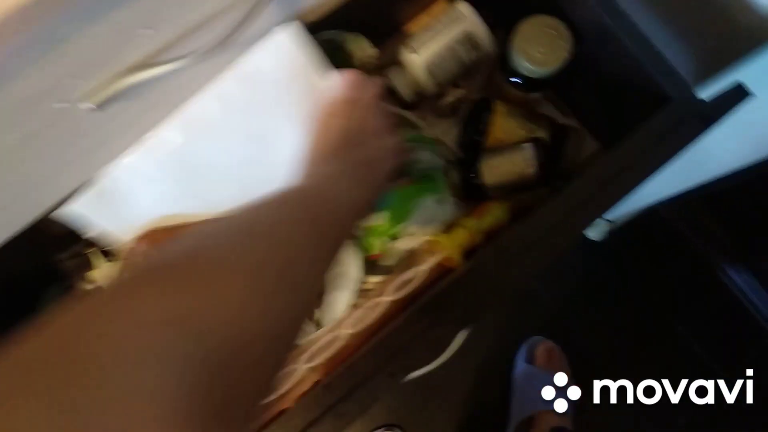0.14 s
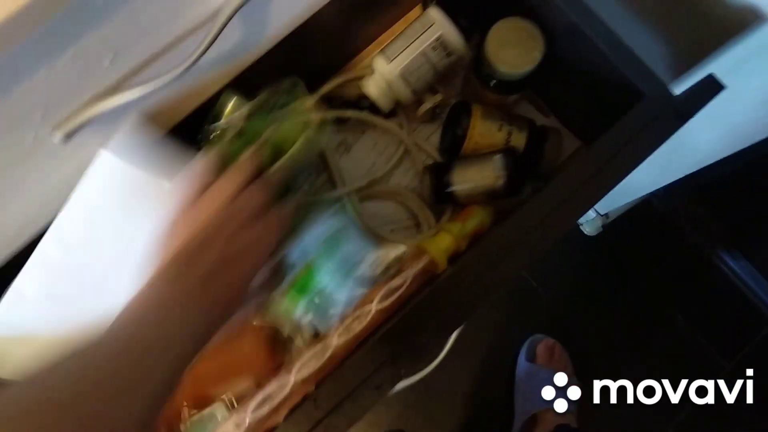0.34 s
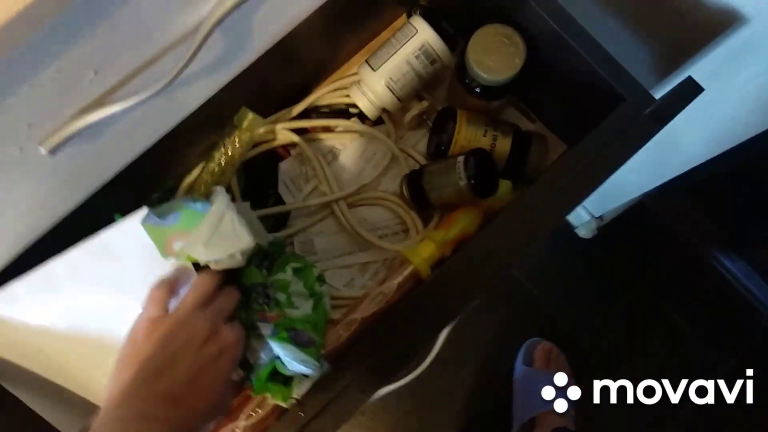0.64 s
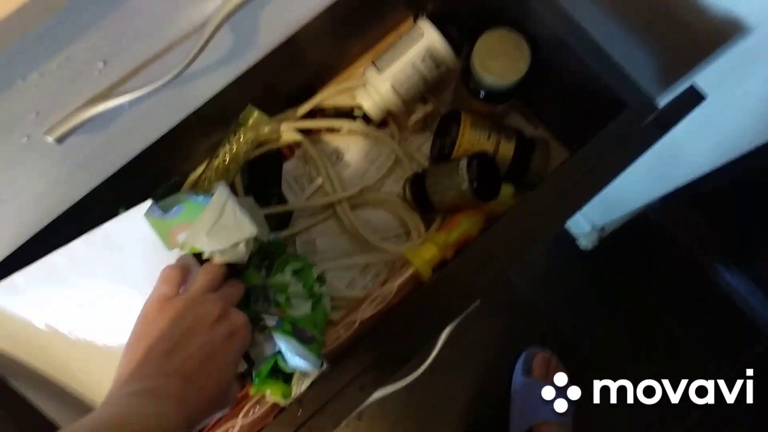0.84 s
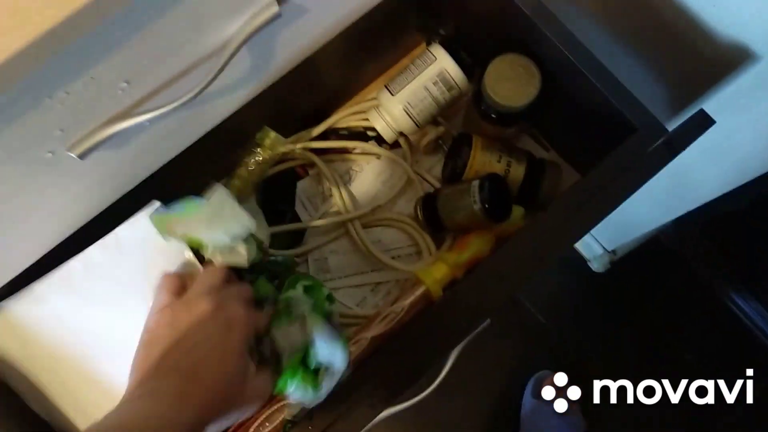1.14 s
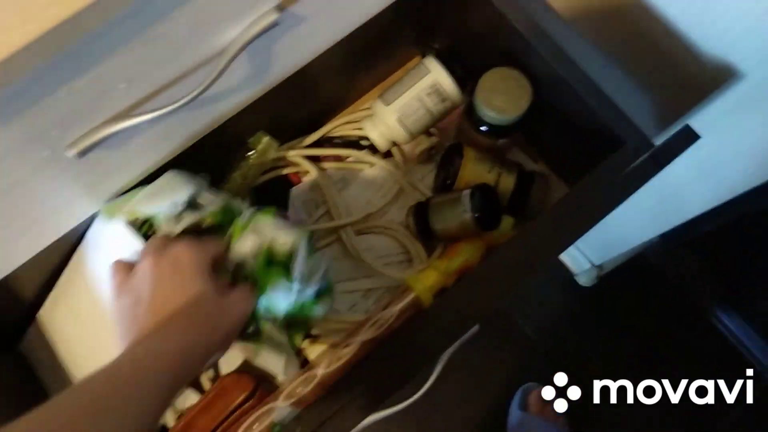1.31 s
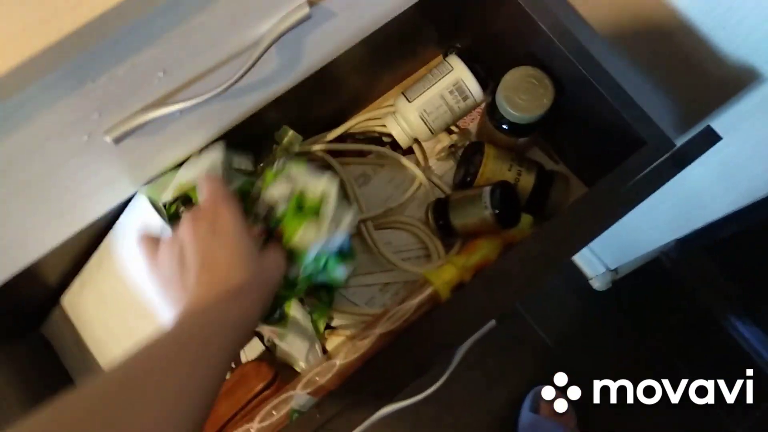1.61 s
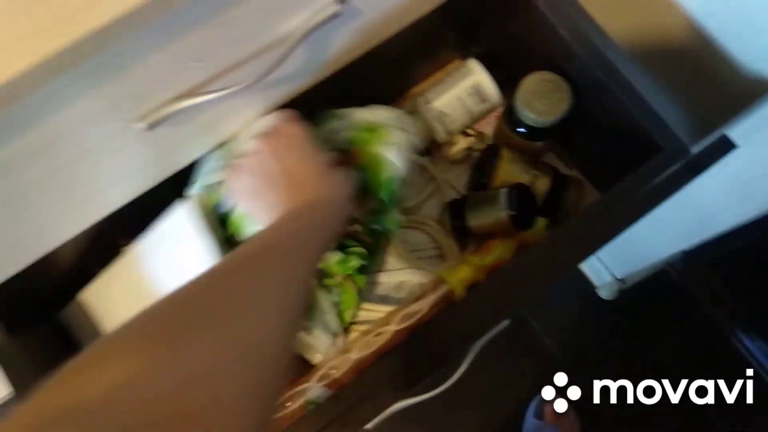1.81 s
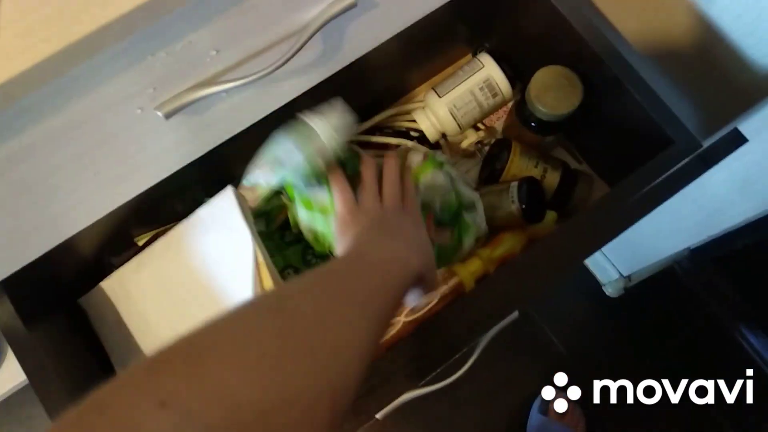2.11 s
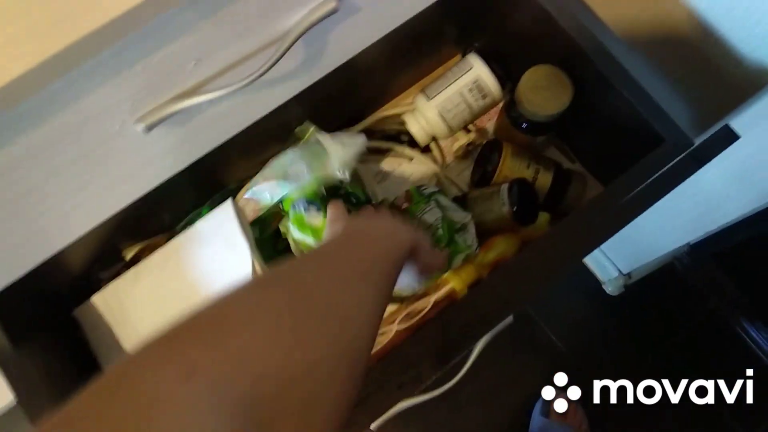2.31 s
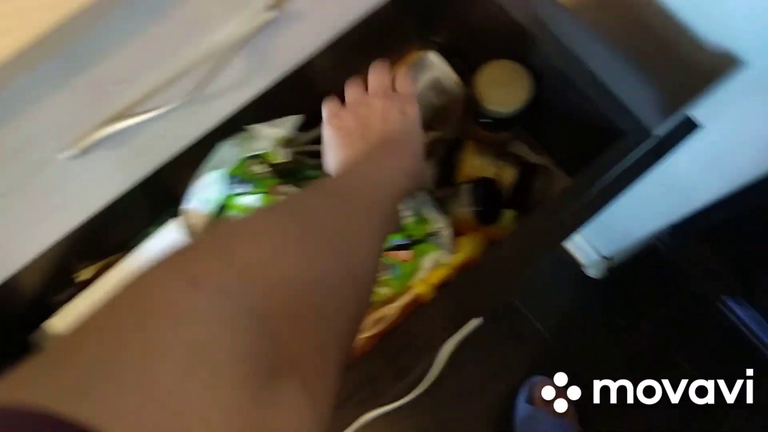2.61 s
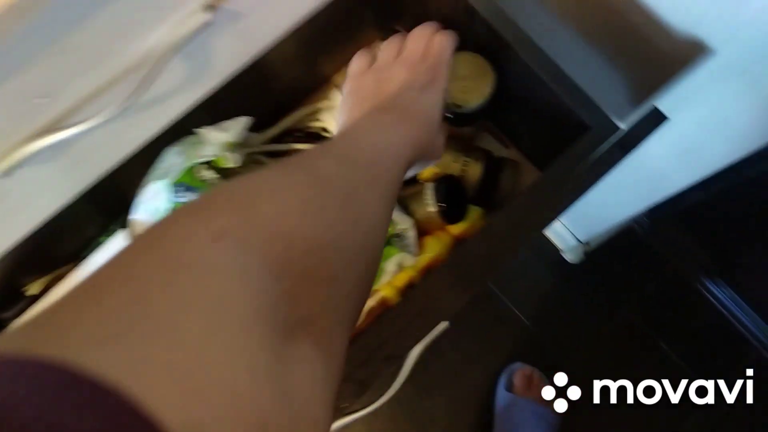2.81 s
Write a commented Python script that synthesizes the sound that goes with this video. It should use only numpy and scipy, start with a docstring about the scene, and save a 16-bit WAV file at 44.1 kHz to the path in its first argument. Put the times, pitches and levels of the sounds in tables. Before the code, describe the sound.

Crinkling plastic bags with sharp snaps and dull drawer bumps, ending in faint jar clicks

```python
"""Thin plastic bags are crumpled by a hand in a cluttered wooden drawer, close by, in a small room.
Their rustle is a swarm of tiny damped pings over sliding noise; noise-burst snaps stand out of it.
Low noise scuffs the drawer, its panel modes ring to dull bumps, and hollow containers knock as single tones.
At the end jars and bottles rub faintly and click (struck modes and ticks) and three tones ring on.
Short echoes, a room tail and quiet coloured noise surround it; a small microphone sheds the deep bass."""
import sys
import numpy as np
from scipy import signal
from scipy.fft import rfft, irfft, next_fast_len
from scipy.io import wavfile
from scipy.ndimage import uniform_filter1d, map_coordinates

SR = 44100
rng = np.random.default_rng(int(sys.argv[2]) if len(sys.argv) > 2 else 0)


def waveform_to_disk(signal):
    """Save audio, clipped to [-1, 1], as 16-bit WAV at the path in sys.argv[1]."""
    frames = np.transpose(np.atleast_2d(signal))
    scaled = np.clip(frames, -1, 1) * 32767
    samples = np.round(scaled).astype(np.int16)
    wavfile.write(sys.argv[1], SR, samples)


N = 130095
TOP_HZ = 15850  # upper band limit of the microphone and the snaps
GRAB_START_S, GRAB_END_S = 1.34, 1.68  # the hand closes round the bag

# colour of the scuffing: pitch_hz, level_db (relative, per Hz)
SCUFF_COLOUR = [(35, -59.5), (60, -39), (166, -26), (215, -9), (291, -12), (405, 1.5), (498, -1), (620, -9),
                (752, -11), (862, -27.5), (1090, -21), (1200, -16), (1600, -15), (2080, -20), (3520, -120)]
SCUFF_DB = 0.5  # added to the scuffing of every row of STROKES
CREASE_DB, CREASES_PER_S, CREASE_CYCLES, CREASE_SPREAD_DB = -2, 3600, 1.67, 3.5
SLIDE_DB = -3.5
# wider facets of the film flip over more rarely and ring longer; they stand out in gentle strokes
FACETS_PER_S, FACET_FLIPS_PER_S, FACET_CYCLES, FACET_SPREAD_DB = 800, 190, 9.1, 4
FACET_DB, FACET_GROWS_DB = -8.5, 0.55  # level, and its growth per dB below the hardest stroke
# a gentler stroke crackles more unevenly, per dB below the hardest
CLUMPS_PER_S, CLUMP_DB, CLUMP_GROWS_DB = 170, 1, 0.2774
SLIDE_FROM_S, SLIDE_UNEVEN = (2.3, 2.483), 0.63  # at last the bag mostly slides, with less crackle
TREBLE_HZ = 4740


LIFTED_HZ = 287  # the lifted bag no longer drives the drawer's panels below this


def bags_and_rub():
    """Strokes crumple, slide and scuff the bags; a last faint rub of the jars is made of the same noises."""
    t = np.arange(N) / SR
    level_db, tilt_db, scuff_db = effort()
    gentle_db = np.minimum(level_db.max() - level_db, 13) * np.interp(t, SLIDE_FROM_S, [1, SLIDE_UNEVEN])

    depth_db = CLUMP_DB + CLUMP_GROWS_DB * gentle_db
    # deeper clumping is turned down to offset its louder peaks
    clumps_db = depth_db * np.clip(wobble(CLUMPS_PER_S), -2, 2) - depth_db ** 2 / 10

    creases = pings(CREASES_PER_S, CREASE_CYCLES, CREASE_SPREAD_DB, CREASES_PER_S, size=128)
    fine = amp(CREASE_DB) * creases + amp(SLIDE_DB) * noise(BAG_COLOUR)
    facets = pings(FACETS_PER_S, FACET_CYCLES, FACET_SPREAD_DB, FACET_FLIPS_PER_S)
    share = amp(FACET_DB + FACET_GROWS_DB * gentle_db)
    film = (fine + share * facets) / np.sqrt(1 + share ** 2) * amp(clumps_db)

    treble = filtered(film, lambda hz: hz ** 4 / (hz ** 4 + TREBLE_HZ ** 4))
    tilted = treble * amp(tilt_db) + (film - treble) * amp(-.7 * tilt_db)
    crinkle = amp(level_db) * tilted

    scuff = amp(scuff_db + SCUFF_DB) * unit(noise(SCUFF_COLOUR) * amp(0.68 * clumps_db))
    lifted = np.interp(t, [GRAB_START_S, GRAB_END_S], [0, 1])
    scuff = scuff - lifted * filtered(scuff, lambda hz: 1 / (1 + (hz / LIFTED_HZ) ** 6))
    return folds(folds(pockets(crinkle + scuff)))


# strokes of the hand on the bags; the last row is a short faint rub of the jars; rise and fall span 20 dB
# start_s (at full strength), hold_s, rise_s, fall_s, crinkle_db, treble_tilt_db, scuff_db (before SCUFF_DB)
STROKES = [(.005, 0.0084, 0.048, 0.032, -28, 0.5, -35.5), (0.049, 0.082, 0.023, 0.057, -29, -2, -40),
           (0.107, 0.05, 0.058, 0.028, -20.5, -1, -33.5), (0.164, .22, 0.015, 0.043, -18.5, -1, -31),
           (0.443, 0.14, 0.13, 0.074, -18.5, -1, -33), (0.611, 0.034, 0.028, 0.079, -25, -2, -37),
           (0.723, 0.037, 0.037, 0.068, -31.5, -3, -43), (0.782, 0.12, 0.05, 0.15, -30, -2.5, -45),
           (0.94, 0.032, 0.045, 0.069, -26.5, -2, -40), (0.992, 0.09, 0.017, .16, -22.5, -0.5, -38.5),
           (1.195, 0.18, 0.086, 0.15, -21.5, -0.5, -38.5), (1.395, 0.026, 0.019, 0.42, -33, -13, -41.5),
           (1.52, 0.19, 0.077, 0.031, -26, 0, -53.5), (1.729, 0.092, 0.11, 0.024, -22, -0.5, -43),
           (1.809, 0.034, .03, 0.11, -27.5, -1.5, -30.5), (1.907, 0.022, 0.045, 0.028, -25, -6, -47),
           (1.945, 0.063, 0.058, 0.1, -19, .5, -34), (2.032, 0.073, 0.027, 0.018, -29, 3.5, -42),
           (2.197, 0.024, 0.045, .03, -40, -16, -45), (2.246, 0.056, 0.062, 0.047, -18.5, 0, -39.5),
           (2.315, 0.025, .02, 0.014, -26.5, -3, -41.5), (2.37, 0.034, 0.037, 0.058, -50, 6.5, -57),
           (2.434, 0.019, 0.007, 0.037, -38.5, -7.5, -48), (2.492, 0.07, 0.13, 0.012, -32, 0.5, -45.5),
           (2.82, 0.085, 0.13, 0.072, -56.5, -5, -50)]


def effort():
    """Strokes and the rub swell, hold and fade; summed powers give crinkle level, treble tilt, scuff level."""
    s, hold, rise, fall, db, tilt_db, scuff_db = np.transpose(STROKES)[:, :, None]
    t = np.arange(N) / SR
    before, after = np.maximum(s - t, 0), np.maximum(t - s - hold, 0)
    shape = amp(-20 * (before / rise + after / fall)) ** 2
    power = shape * amp(db) ** 2 + 1e-14
    scuff_power = (shape * amp(scuff_db) ** 2).sum(0) + 1e-14
    mean_tilt_db = (power * tilt_db).sum(0) / power.sum(0)  # the loudest rows set the tilt
    return 10 * np.log10(power.sum(0)), mean_tilt_db, 10 * np.log10(scuff_power)


# colour of the rustling film: pitch_hz, level_db (relative, per Hz)
BAG_COLOUR = [(410, -56.5), (700, -5), (898, -18), (1090, -9.5), (1200, -9.5), (1620, -11), (1890, -9.5),
              (2220, -2), (2660, 0.5), (3840, -4.5), (9350, 0), (15200, -15.5), (16000, -11.5)]
PING_LOW_HZ, PING_HIGH_HZ = 879, 14880
PING_LONGEST_S = 0.0022  # upper bound on a ping's decay time constant


def pings(per_s, life_cycles, spread_db, onsets_per_s, size=640):
    """A swarm of tiny damped pings of uneven size, sharing a set of onsets, in the colour of the bags."""
    count = int(per_s * N / SR)
    onsets = rng.random(int(onsets_per_s * N / SR))
    first = (rng.choice(onsets, count) * N).astype(int)
    phase, pitch = rng.random((2, count))
    strength = rng.standard_normal(count)

    k = np.arange(size)
    ping_hz = PING_LOW_HZ * (PING_HIGH_HZ / PING_LOW_HZ) ** pitch
    cycles = ping_hz[:, None] * k / SR
    decay = np.exp(-cycles / life_cycles - k / SR / PING_LONGEST_S)
    sizes = amp(spread_db * np.minimum(strength, 1.7))[:, None]
    waves = sizes * decay * np.sin(2 * np.pi * (cycles + phase[:, None]))
    swarm = rfft(np.bincount((first[:, None] + k).ravel(), waves.ravel(), N)[:N])

    # flatten the swarm's broad spectrum, then give it the film's colour
    smooth_power = np.abs(uniform_filter1d(np.abs(swarm) ** 2, size=3001))
    white = irfft(swarm / np.sqrt(smooth_power + 1e-12), N)
    return unit(filtered(white, lambda hz: amp(along(BAG_COLOUR, hz)) * hz ** 4 / (hz ** 4 + 850 ** 4)))


# hollow pockets that form in the crumpled bag: peak_s, pitch_hz, gain_db
POCKETS = [(1.53, 3450, 9.5), (1.62, 4870, 11), (1.85, 2700, 12), (1.85, 540, 4.5), (2.0, 484, 2.5),
           (2.24, 2460, 4), (2.28, 364, 6), (2.3, 1486, 2.5), (2.44, 2350, 4), (2.51, 2760, 3),
           (2.52, 3720, 8)]
POCKET_LIFE_S, POCKET_WIDTH_HZ, MUFFLE_DB = 0.046, 90, -1.5


def pockets(x):
    """The closed hand muffles the rustle a little; each pocket rings with it for a moment, then collapses."""
    t = np.arange(N) / SR
    out = x * amp(np.interp(t, [GRAB_START_S, GRAB_END_S], [0, MUFFLE_DB]))
    for s, hz, db in POCKETS:
        b, a = signal.iirpeak(hz, hz / POCKET_WIDTH_HZ, fs=SR)
        life = np.exp(-((t - s) / POCKET_LIFE_S) ** 2)
        out = out + amp(db) * life * signal.lfilter(b, a, x)
    return out


# once the hand closes round the bag, its folds and the arm send back stronger echoes
FOLD_OPEN, FOLD_CLOSED = 0.061, 0.27  # gain of each echo
FOLD_DELAY_S, FOLD_DRIFT, FOLD_MOVES_PER_S = .003, 0.0957, 8


def folds(x, count=6):
    """Short drifting echoes give the crinkle hollow, shifting resonances."""
    n = np.arange(N)
    share = np.interp(n / SR, [GRAB_START_S, GRAB_END_S], [FOLD_OPEN, FOLD_CLOSED])
    echoes = np.zeros(N)
    for k in range(count):
        rest_s = FOLD_DELAY_S * (k + 1 + rng.random()) / count
        delay_s = rest_s * (1 + FOLD_DRIFT * wobble(FOLD_MOVES_PER_S))
        echoes += rng.choice([-1, 1]) * np.interp(n - delay_s * SR, n, x)
    return (x + share * echoes) / np.sqrt(1 + count * share ** 2)


# folds that buckle with a snap: start_s, level_db (peak, before SNAP_DB), pitch_hz
SNAPS = [(0.107, -5, 8900), (.381, -2, 8000), (.388, -2, 9400), (.484, -4, 7700), (0.49, -2, 5200),
         (0.5679, -5, 3300), (0.62, -1.5, 8400), (0.7097, -1, 7230), (0.775, -25, 5300), (.800, -16, 6940),
         (0.834, -20, 3680), (0.854, -14.5, 6050), (0.864, -19, 6500), (0.874, -16, 4930),
         (0.9378, -10.5, 3100), (0.94, -6, 7700), (.967, -9, 3860), (0.99, -9.5, 7800), (1.106, -18, 7420),
         (1.1293, -5.5, 5100), (1.291, -5.5, 8150), (1.34, -7.5, 7900), (1.3725, -8.5, 8800),
         (1.4563, -3.5, 6900), (1.4716, -10.5, 8260), (1.5721, -5, 7800), (1.618, -4, 5500),
         (1.6357, -7, 8800), (1.657, -1.5, 8200), (1.665, -2, 8800), (1.709, -11, 2990),
         (1.823, -7.5, 6160), (1.89, -8.5, 9900), (2.0476, -5.5, 7200), (2.118, -6.5, 7600),
         (2.183, -25, 2520), (2.206, -18, 5160), (2.2255, -8.5, 7900), (2.372, -24, 7500),
         (2.4307, -25.5, 4950)]
SNAP_DB, SNAP_T60_S, SNAP_OCTAVES = -3, 0.0058, 0.91


def snaps():
    """Single stiff folds give way, each as a short noise burst around its own pitch."""
    out = np.zeros(N)
    for s, db, hz in SNAPS:
        add(out, s, amp(db + SNAP_DB) * crack(hz, SNAP_OCTAVES, SNAP_T60_S))
    return out


SNAP_ATTACK_S, SNAP_TAIL_DB, SNAP_TAIL_T60_S = 0.00047, -22, 0.044
SNAP_LOW_HZ, SNAP_BROAD = 1700, 0.33  # lower edge and gain of the broad click


def crack(centre_hz, octaves, t60):
    """A short burst with a weak tail, ringing around centre_hz over a fainter broad click."""
    t = np.arange(SR // 4) / SR
    decay = amp(-60 * t / t60) + amp(SNAP_TAIL_DB - 60 * t / SNAP_TAIL_T60_S)
    envelope = decay * (1 - np.exp(-t / SNAP_ATTACK_S))
    burst = bandpass(rng.standard_normal(len(t)) * envelope, [SNAP_LOW_HZ, TOP_HZ])
    edges = np.minimum(centre_hz * 2. ** (octaves * np.array([-.5, .5])), [TOP_HZ - 10, TOP_HZ])
    return peak(peak(bandpass(burst, edges)) + SNAP_BROAD * peak(burst))


# modes of the drawer's wooden panels: pitch_hz, level_db (relative), t60_s
DRAWER = [(224, -4.5, 0.15), (320, 10.5, 0.021), (359.5, -1.5, 0.048), (404.7, 5, 0.082),
          (489.4, 3.5, 0.094), (554, 5, 0.048), (689.5, 10, 0.038), (737, -0.5, 0.025)]
# things bumping the drawer: start_s, level_db (peak, before the high-pass), pitch_hz (driven hardest)
BUMPS = [(.106, -21.5, 403), (.197, -20.5, 720), (.314, -20.5, 620), (.408, -11.5, 340), (.421, -16.5, 417),
         (0.454, -15.5, 330), (.536, -13.5, 513), (0.552, -19.5, 360), (.785, -36, 302), (.867, -27.5, 457),
         (1.34, -25.5, 256), (1.035, -26, 406), (1.398, -25.5, 410), (1.46, -33, 460), (1.737, -27.5, 386),
         (1.982, -23, 420)]
BUMP_OCTAVES, BUMP_ATTACK_S = 0.44, 0.0026
BUMP_LOW_HZ = 100  # the small drawer gives off no deeper thud


def bumps():
    """Dull bumps ring the drawer's panel modes, most strongly near the pitch each one drives."""
    out = np.zeros(N)
    for s, db, hz in BUMPS:
        add(out, s, amp(db) * ring(DRAWER, hz, BUMP_OCTAVES, BUMP_ATTACK_S))
    return without_thud(out)


# hollow plastic containers knocked: start_s, level_db (peak, before the high-pass), pitch_hz, t60_s
KNOCKS = [(0.174, -15.5, 1104, 0.04), (0.5, -22.5, 1025, 0.026), (2.117, -35, 1370, 0.036),
          (2.545, -36, 2180, 0.052), (2.657, -40, 1300, 0.042), (2.888, -42.5, 1460, 0.047)]


def knocks():
    """Each knocked hollow container gives one short damped tone."""
    out, t = np.zeros(N), np.arange(SR // 4) / SR
    for s, db, hz, t60 in KNOCKS:
        envelope = amp(-60 * t / t60) * (1 - np.exp(-t / BUMP_ATTACK_S))
        add(out, s, amp(db) * peak(envelope * np.sin(2 * np.pi * hz * t)))
    return without_thud(out)


def without_thud(x):
    """High-pass the bumps and knocks: the small drawer radiates little deep bass."""
    return signal.sosfilt(signal.butter(2, BUMP_LOW_HZ, "high", fs=SR, output="sos"), x)


RING_ROUGH = 0.00023  # phase scatter of a rattling body: timing wander in s after one second
MODE_SCATTER_DB = 2.9


def ring(modes, centre_hz, octaves, attack_s):
    """A struck body is a sum of damped, slightly unsteady modes; those near centre_hz are driven hardest."""
    t = np.arange(SR // 4) / SR
    tones = np.zeros(len(t))
    for hz, db, t60 in modes:
        unsteady_t = t + RING_ROUGH * np.cumsum(rng.standard_normal(len(t))) / np.sqrt(SR)
        envelope = amp(db + rng.normal(0, MODE_SCATTER_DB) - 60 * t / t60)
        tone = np.sin(2 * np.pi * (hz * unsteady_t + rng.random()))
        tones += hump(hz, centre_hz, octaves) * envelope * tone
    return peak(tones * (1 - np.exp(-t / attack_s)) ** 2)


# modes of the three containers that touch, each: pitch_hz, level_db (relative), t60_s
BOTTLE = [(2850, -7, .03), (3600, 0, .045), (3790, -2, .04), (4170, -11, .04), (6280, -6, .025),
          (7260, -5, .022), (9080, -6, .018), (10100, -5, .02), (12450, -7, .022)]
JAR = [(2750, 1.5, 0.022), (4490, -9.5, 0.018), (8450, -2, 0.018), (10100, -5, 0.021)]
LID = [(2530, -2, 0.029), (5000, 0, 0.017), (5130, -1, 0.021), (6370, -13, .06), (8000, -3, .025),
       (10000, 1.5, 0.017)]
# containers touching: start_s, level_db (before the ring and tick levels), pitch_hz (driven hardest), container
CLINKS = [(2.618, -27, 3440, "bottle"), (2.627, -33, 3700, "bottle"), (2.643, -21.5, 8300, "bottle"),
          (2.657, -28.5, 5170, "bottle"), (2.723, -47, 2670, "jar"), (2.756, -22, 3330, "jar"),
          (2.792, -37.5, 3380, "lid"), (2.826, -24.5, 8000, "lid"), (2.8878, -35, 2930, "jar")]
CLINK_RING_DB, CLINK_TICK_DB = -1.5, -4
CLINK_T60_S, CLINK_OCTAVES, CLINK_ATTACK_S = 0.03, 1.6, 0.00079


def clinks():
    """Each contact ticks and briefly rings the modes of one tightly packed container."""
    out = np.zeros(N)
    bodies = {"bottle": BOTTLE, "jar": JAR, "lid": LID}
    for s, db, hz, name in CLINKS:
        body = amp(CLINK_RING_DB) * ring(bodies[name], hz, CLINK_OCTAVES, CLINK_ATTACK_S)
        tick = amp(CLINK_TICK_DB) * crack(hz, CLINK_OCTAVES, CLINK_T60_S)
        add(out, s, amp(db) * (body + tick))
    return out


# a faint lingering ring among the jars: pitch_hz, level_db, t60_s
FAINT_RING = [(533, -53, 0.6), (900, -54.5, 0.75), (1860, -58, 0.71)]
RING_AT_S, RING_ATTACK_S = 2.76, 0.017


def faint_ring():
    """Three slowly damped tones ring on together after a soft onset."""
    out, t = np.zeros(N), np.arange(SR // 2) / SR
    tones = sum(amp(db - 60 * t / t60) * np.sin(2 * np.pi * hz * t) for hz, db, t60 in FAINT_RING)
    add(out, RING_AT_S, (1 - np.exp(-t / RING_ATTACK_S)) * tones)
    return out


# decay of the small room: pitch_hz, t60_s
ROOM_DECAY = [(200, 0.24), (2000, 0.41), (12000, 0.2)]
ROOM_DB = -19
WALLS_DB, WALLS_S = -10.5, .011  # reflections inside the drawer: joint level, span of their delays


def room(x):
    """A few quick reflections from the drawer's walls, and the room's short tail of decaying noise."""
    hz, t, z = signal.stft(rng.standard_normal(SR // 3), SR, nperseg=256)
    decay = amp(-60 * t / along(ROOM_DECAY, hz)[:, None])
    tail = signal.istft(z * decay, SR, nperseg=256)[1]
    answer = amp(ROOM_DB) * tail / np.linalg.norm(tail)
    walls = rng.random((8, 2))
    for delay, sign in walls:
        reflection = amp(WALLS_DB) * np.sign(sign - .5) / np.sqrt(len(walls))
        add(answer, WALLS_S * (0.10055 + delay), np.array([reflection]))
    return x + signal.fftconvolve(x, answer)[:N]


# colour of the quiet room: pitch_hz, level_db (relative, per Hz)
FLOOR_COLOUR = [(40, -32.5), (140, -18.5), (210, -9.5), (500, -0.5), (850, -14.5), (2600, -8), (4600, -13),
                (10000, -18), (16000, -42)]
FLOOR_DB = -58.5  # rms before the microphone


def quiet_room():
    """Steady coloured noise lies under everything."""
    return amp(FLOOR_DB) * noise(FLOOR_COLOUR)


def amp(db):
    """Decibels to amplitude."""
    return 10 ** (np.asarray(db) / 20)


def unit(x):
    """Scale to rms 1."""
    return x / np.sqrt(np.mean(x ** 2) + 1e-20)


def peak(x):
    """Scale to peak 1."""
    return x / (np.abs(x).max() + 1e-20)


def along(points, hz):
    """Interpolate (Hz, value) points on a log frequency axis."""
    f, v = np.transpose(points)
    return np.interp(np.log(hz + 1), np.log(f + 1), v)


def hump(hz, centre_hz, octaves):
    """A broad resonance-shaped gain."""
    return 1 / (1 + (np.log2((hz + 1) / centre_hz) / octaves) ** 2)


def wobble(rate):
    """A smooth random curve, rate knots a second."""
    return map_coordinates(rng.standard_normal(4096), [np.arange(N) * rate / SR], mode="wrap")


def filtered(x, response):
    """Multiply the spectrum of x by a response of frequency."""
    m = next_fast_len(len(x) + 4096)
    return irfft(rfft(x, m) * response(np.fft.rfftfreq(m, 1 / SR)), m)[:len(x)]


def bandpass(x, edges_hz):
    """Keep the band between two edges."""
    return signal.sosfilt(signal.butter(2, edges_hz, "band", fs=SR, output="sos"), x)


def noise(spectrum):
    """Coloured noise of rms 1."""
    return unit(filtered(rng.standard_normal(N), lambda hz: amp(along(spectrum, hz))))


def add(track, s, sound):
    """Mix a sound in at s seconds."""
    i = min(N, max(0, round(s * SR)))
    track[i:i + len(sound)] += sound[:N - i]


def scene():
    """Everything in the drawer, over the quiet of the room."""
    drawer = bags_and_rub() + snaps() + bumps() + knocks() + clinks() + faint_ring()
    return (room(drawer) + quiet_room())[None]


MIC_LOW_HZ = 90


def record(dry):
    """The small microphone sheds the deep bass; nothing is kept above the band limit."""
    return filtered(dry[0], lambda hz: hz ** 2 / np.sqrt(hz ** 4 + MIC_LOW_HZ ** 4) * (hz < TOP_HZ))[None]


dry = scene()
out = record(dry)
waveform_to_disk(out)
```